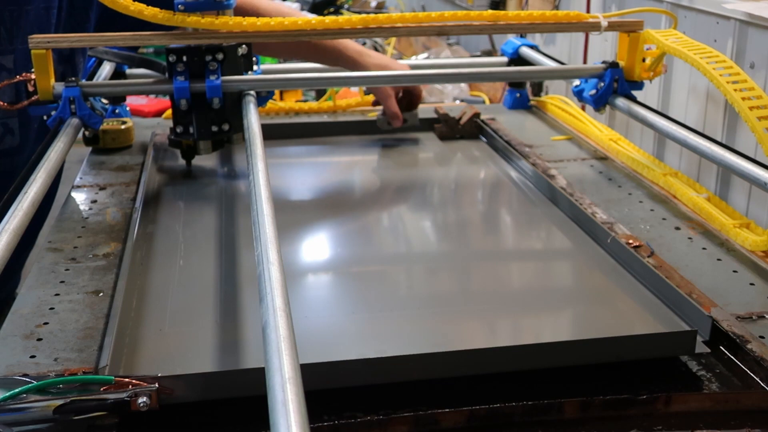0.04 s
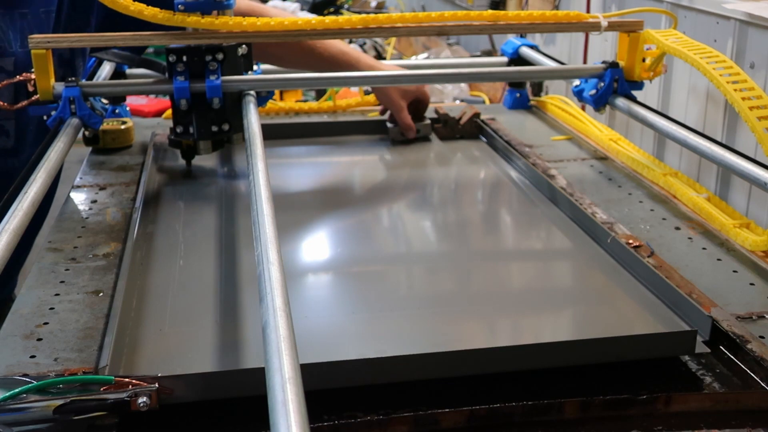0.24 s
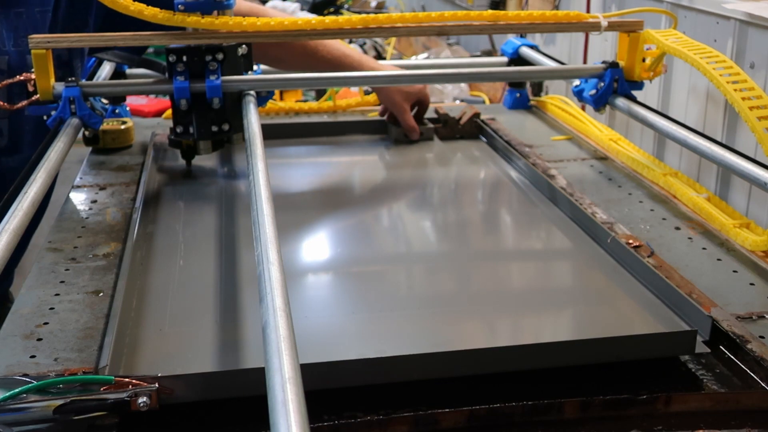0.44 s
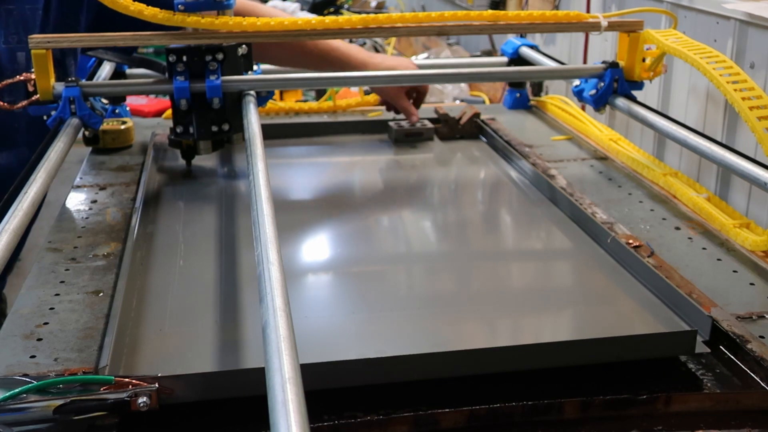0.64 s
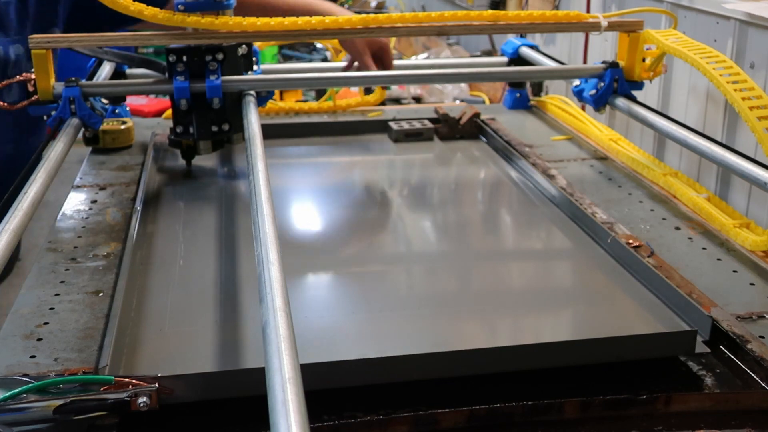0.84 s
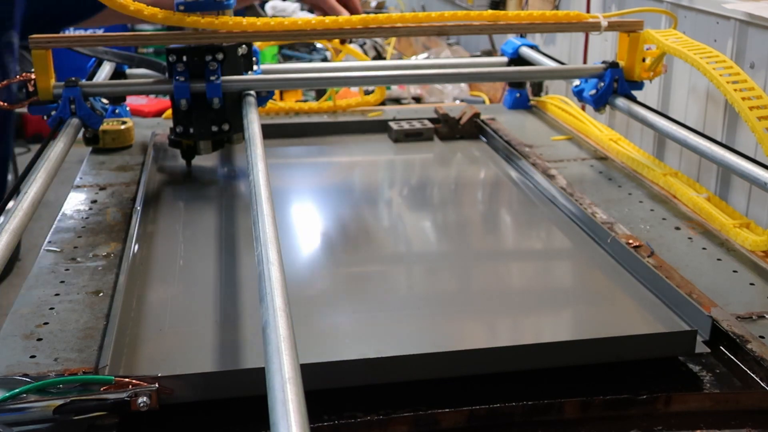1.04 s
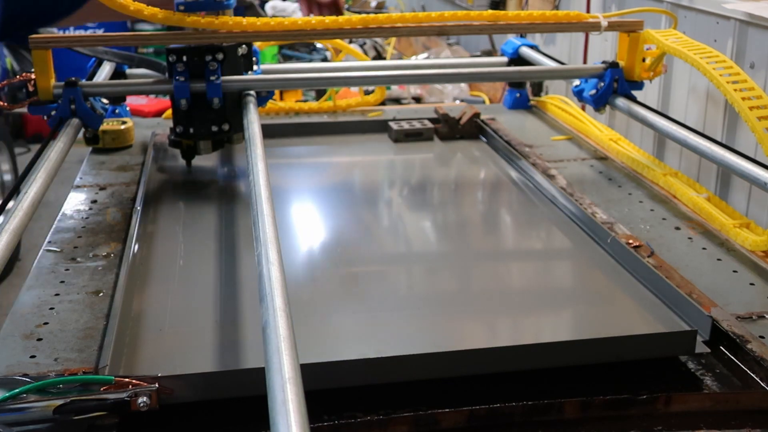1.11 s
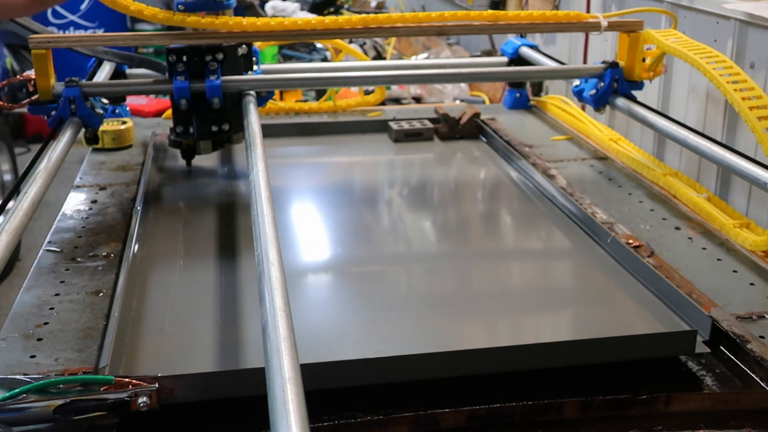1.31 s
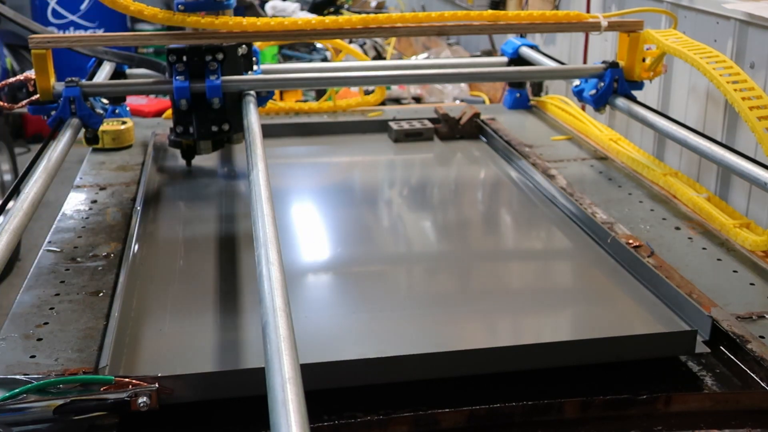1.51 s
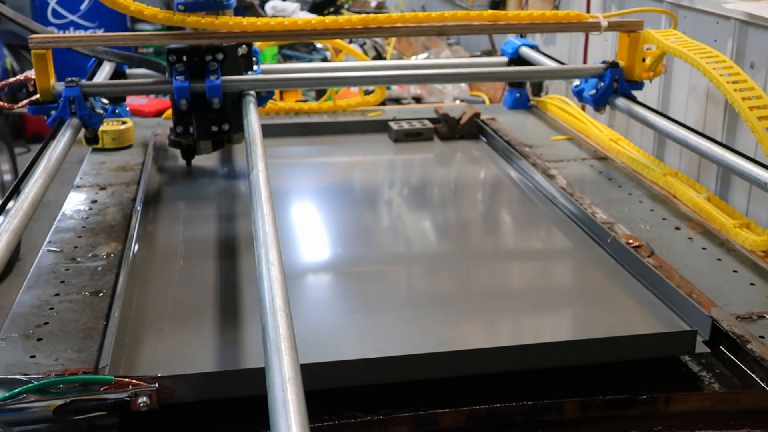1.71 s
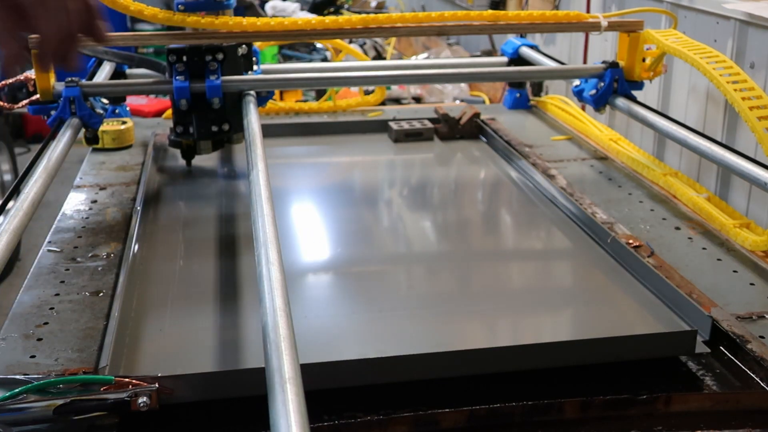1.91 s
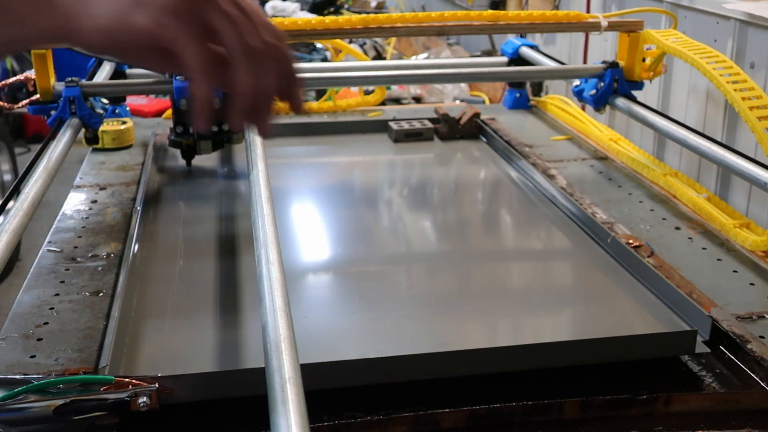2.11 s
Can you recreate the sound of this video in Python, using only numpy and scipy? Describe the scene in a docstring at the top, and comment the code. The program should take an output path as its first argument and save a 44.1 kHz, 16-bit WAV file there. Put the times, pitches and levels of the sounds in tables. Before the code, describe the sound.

A small steel block lands on a large steel sheet with a clunk, scrapes, then drops flat with a brighter clack. The sheet rings briefly close to the microphone, while workshop machinery hums steadily behind.

```python
"""Steel block on a workshop table

Near the stereo microphone, a little to the right, a small steel block is set down on a large steel sheet.
One edge lands with a clunk; the block scrapes, drops flat with a brighter clack and ticks as it is let go.
Each contact rings the damped sheet into the room, until fingers press the block and mute some modes.
Machinery hums steadily behind; faint knocks, handling rustles and a soft bass bump follow."""
import sys
import numpy as np
from scipy import signal
from scipy.fft import rfft, irfft
from scipy.io import wavfile
from scipy.ndimage import uniform_filter1d

SR = 44100
rng = np.random.default_rng(int(sys.argv[2]) if len(sys.argv) > 2 else 0)


def wav_record(signal):
    """Record a signal, one row per channel, as 16-bit PCM in the file named by sys.argv[1]."""
    frames = np.transpose(np.atleast_2d(signal))
    bounded = np.clip(frames, -1, 1)
    # unit amplitude maps onto the largest positive 16-bit level
    quanta = np.round(bounded * 32767).astype(np.int16)
    wavfile.write(sys.argv[1], SR, quanta)


N = 94815


def amp(db):
    """Decibels to gain."""
    return 10 ** (np.asarray(db) / 20)


def unit(x):
    """Scales to rms 1."""
    return x / np.sqrt(np.mean(x ** 2) + 1e-20)


def read(points, hz):
    """Reads a curve on a log-frequency axis."""
    freq_hz, value = np.transpose(points)
    return np.interp(np.log(hz + 1), np.log(freq_hz + 1), value)


def add(mix, start_s, sound):
    """Adds a stereo sound into the mix at start_s."""
    part = mix[:, round(start_s * SR):][:, :sound.shape[1]]
    part += sound[:, :part.shape[1]]


def colour(x, points, size=4096):
    """Minimum-phase filter along a (freq_hz, gain_db) curve."""
    log_gain = np.log(amp(read(points, abs(np.fft.fftfreq(size, 1 / SR)))))
    response = np.exp(np.conj(signal.hilbert(log_gain)))
    taps = np.fft.ifft(response).real[:size // 2]
    return signal.fftconvolve(x, taps[None], axes=1)[:, :x.shape[1]]


def noise(length, level_db, correlation, size=256):
    """Stereo noise shaped by level_db(hz, t), with a left-right correlation curve."""
    frames = dict(fs=SR, nperseg=size, noverlap=size * 3 // 4)
    hz, t, bins = signal.stft(rng.standard_normal((2, length)), **frames)
    shared = np.clip(read(correlation, hz), -1, 1)[:, None]
    bins[1] = shared * bins[0] + np.sqrt(1 - shared ** 2) * bins[1]
    return signal.istft(bins * amp(level_db(hz[:, None], t)), **frames)[1][:, :length]


def drift(rate_hz):
    """Random motion of rms 1, mostly slower than rate_hz."""
    hz = np.fft.rfftfreq(N, 1 / SR)
    return unit(irfft(rfft(rng.standard_normal(N)) / (1 + (hz / rate_hz) ** 2), N))


def ripple(x, depth_db):
    """Many narrow resonances: random, unmoving peaks and dips in the treble."""
    hz = np.geomspace(1500, 15000, 130)
    db = depth_db * rng.standard_normal(len(hz)) * (hz > hz[0])
    return colour(x, list(zip(hz, db)))


def lean(x, balance):
    """Tips each frequency of a stereo sound to one side."""
    half_db = read(balance, np.fft.rfftfreq(N, 1 / SR)) / 2
    return irfft(rfft(x) * amp([half_db, -half_db]), N)


# Air rushing in the machinery at the back of the shop: freq_hz, relative_db
AIR_SPECTRUM = [(25, -32), (60, -14), (105, -40), (135, -12.5), (180, -19), (240, -8.5), (305, -14),
                (375, -5.5), (440, -14.5), (560, -16.5), (660, -14.5), (740, -11), (830, -18.5), (950, -17),
                (1170, -23.5), (1450, -20), (1800, -22.5), (2100, -25), (2750, -26), (3500, -32.5),
                (6000, -37), (7500, -44.5), (8700, -39.5), (9600, -47), (15000, -73.5)]
# How alike the air is in the left and right channels: freq_hz, correlation
AIR_CORRELATION = [(40, 0.99), (700, 0.96), (1400, 0.73), (2700, 0.7), (4000, 0.026), (5500, -0.21),
                   (7500, -0.2), (9000, -1.016)]
def air_rush():
    """A steady rush of air whose spectrum flickers in small patches."""
    def level_db(hz, t):
        patches = uniform_filter1d(rng.standard_normal((len(hz), len(t))), size=12, axis=0)
        patches = unit(uniform_filter1d(patches, size=8, axis=1))
        return read(AIR_SPECTRUM, hz) + 1.5 * patches
    air = noise(N, level_db, AIR_CORRELATION, size=2048)
    return amp(-33.5) * unit(ripple(air, depth_db=1.75))


# Motors running behind the table: pitch_hz, level_db
MOTOR_TONES = [(59.2, -57.5), (236.9, -47), (257, -46.5), (352, -50.5), (386.5, -44), (623, -49),
               (659.8, -36), (679, -41), (1319, -51), (1437, -59), (1507, -50.5), (1550, -56.5),
               (2713, -60)]
# Their drone eases for a moment: time_s, gain_db
DRONE_LEVEL = [(0, 0), (.85, 0), (1.05, -2.3), (1.27, -2.3), (1.4, .8), (1.85, .8), (2.15, 0)]
def machinery(wander_hz=.8, waver_db=.45, drone_below_hz=1100):
    """Wavering motor tones over the air; the low drone dips briefly while the hiss holds."""
    out = air_rush()
    for hz, db in MOTOR_TONES:
        turns = np.cumsum(hz + wander_hz * drift(rate_hz=7)) / SR + rng.random()
        peak = np.sqrt(2) * amp(db + waver_db * drift(rate_hz=7))
        out = out + peak * np.sin(2 * np.pi * turns)
    drone = signal.sosfiltfilt(signal.butter(2, drone_below_hz, fs=SR, output="sos"), out)
    drone_gain = amp(np.interp(np.arange(N) / SR, *np.transpose(DRONE_LEVEL)))
    return out + drone * (drone_gain - 1)


# Knocks from elsewhere in the shop: start_s, thud_db, clang_db, tick_db
FAR_KNOCKS = [(1.398, -6, -30, -45), (1.836, 1.5, -30, -27)]
# Their dull tone: freq_hz, gain_db
KNOCK_SPECTRUM = [(60, -16), (110, -10), (230, -1), (350, 1), (500, 1), (750, -10), (2000, -10),
                  (5000, -14), (12000, -29)]
# How alike left and right are for knocks, rustles and the sheet's dense ring: freq_hz, correlation
ROOM_CORRELATION = [(150, .998), (700, 0.95), (1600, 0.92), (3600, 0.76), (5200, 0.31), (8000, -0.15),
                    (11500, -0.69), (13400, -0.052)]
def far_knocks(rise_s=.008, t60_s=.11):
    """Dull, short knocks away from the sheet, each a dying burst of noise."""
    out = np.zeros((2, N))
    rise = np.minimum(np.arange(SR // 2) / SR / rise_s, 1)
    for start_s, *levels_db in FAR_KNOCKS:
        burst = rise * noise(SR // 2, lambda hz, t: -4 - 60 * t / t60_s, ROOM_CORRELATION)
        knock = colour(burst, KNOCK_SPECTRUM)
        add(out, start_s, colour(knock, hardness(*levels_db)))
    return out


def bass_bump(start_s=1.795, pitch_hz=64.3, peak_db=-41, rise_s=.035):
    """A few soft cycles of bass swell and fade."""
    t = np.maximum(np.arange(N) / SR - start_s, 0)
    swell = t / rise_s * np.exp(1 - t / rise_s)
    return amp(peak_db) * swell * np.sin(2 * np.pi * pitch_hz * t)


# Handling, faint at the microphone: start_s, length_s, level_db
HANDLING = [(1.01, 0.07, -63), (1.792, .12, -54), (1.872, .07, -62), (1.962, .09, -59)]
# Its hiss: freq_hz, relative_db
RUSTLE_SPECTRUM = [(300, -8), (3000, 3), (8000, -3), (13000, -2.5), (15000, -14)]
def handling_rustles(grain_db=5):
    """Soft, grainy swells of high hiss from handling."""
    out = np.zeros((2, N))
    for start_s, length_s, db in HANDLING:
        length = round(length_s * SR)
        hiss = noise(length, lambda hz, t: read(RUSTLE_SPECTRUM, hz), ROOM_CORRELATION)
        grains = amp(grain_db * drift(rate_hz=120)[:length])
        add(out, start_s, amp(db) * np.hanning(length) * unit(hiss * grains))
    return out


# The sheet's many weak modes and their echo in the room, by block pose: freq_hz, on_edge_db, flat_db
RING_SPECTRUM = [(60, -58, -67), (130, -21, -22), (192.4, -15.5, -11), (265, -1, -1), (350, -3, -6),
                 (425, -8, -15), (510, -2, -13), (650, -3, -8), (1000, 0.5, -2.5), (1510, -3, -4),
                 (2030, -8.5, -17), (2870, -12.5, -10.5), (3540, -17.5, -19), (5000, -26, -23),
                 (6600, -22.5, -24), (8500, -29.5, -27), (11500, -22.5, -21.5), (13300, -19.5, -22),
                 (15000, -35, -32)]
# How long they hang in the room: freq_hz, t60_s
RING_DECAY = [(150, 0.78), (600, 0.85), (1500, .45), (3500, 0.5), (7000, 0.37), (13000, 0.16)]
def dense_ring(flat, contact_s=.0018, crack_t60_s=.063):
    """The sheet answers one tap with a short crack and a dense, dying ring."""
    rise = np.minimum(np.arange(SR) / SR / contact_s, 1)
    tail = noise(SR, lambda hz, t: -6.5 - 60 * t / read(RING_DECAY, hz), ROOM_CORRELATION)
    crack = noise(SR, lambda hz, t: -2 - 60 * t / crack_t60_s, ROOM_CORRELATION)
    spectrum = [(hz, flat_db if flat else edge_db) for hz, edge_db, flat_db in RING_SPECTRUM]
    return colour(rise * (tail + crack), spectrum)


# Short slides of the block across the sheet: start_s, length_s, relative_db
BLOCK_SLIDES = [(0.461, .03, -19), (.485, 0.05, -11), (0.658, 0.016, -16)]
# Bright tone of steel catching on steel: freq_hz, gain_db
SCRAPE_SPECTRUM = [(300, -1), (2000, -2.5), (6000, 4.5), (13000, 4.5)]
def block_scrape(catches_per_s=2300, swell_db=7.5):
    """Tiny catches of the sliding edge excite the sheet, harder toward the end of each slide."""
    force = np.zeros(N)
    for start_s, length_s, db in BLOCK_SLIDES:
        progress = (np.arange(N) / SR - start_s) / length_s
        sliding = (progress > 0) & (progress < 1)
        force += amp(db - 22.5 + swell_db * np.clip(progress, 0, 1)) * sliding
    catches = force * rng.standard_normal(N) * (rng.random(N) < catches_per_s / SR)
    ring = colour(dense_ring(flat=False), SCRAPE_SPECTRUM)
    return signal.fftconvolve(catches[None], ring, axes=1)[:, :N]


FLAT_FROM_S, SEATED_FROM_S = .5, .57  # the block is on its edge, then flat, then seated
# Clear modes of the sheet on the table: pitch_hz, on_edge_db, flat_db, seated_db, t60_s, pressed_db
SHEET_MODES = [(327.8, 5, 1, 1.5, 0.21, -9.5), (512, 3, -8, -3, .36, -4), (553, 4, -20, -20, .24, -7),
               (600.4, -5, -1.5, -1.5, 1, -1), (646.3, 3, 5, 4, 0.4, 1.5), (675, 1.5, -6, -4, .4, -1),
               (726, -1.5, -12.5, -6.5, 0.83, -1.5), (810, -2.5, -4.5, -11, .4, -9),
               (870, -5.5, -3, -2.5, 0.54, -1.5), (887.4, 1, -12, -12, 0.33, -8),
               (910, -5, -6, 11, .86, -20), (987, -6, -10, -4.5, .45, -11.5),
               (1130, -18, -6.5, -3, .45, -12), (1215, -11, -6.5, -12, 0.2, -9),
               (1358, -8, -9, -4.5, 0.9, -5.5), (1438, -14, -11, -11.5, 0.45, -8),
               (1565, -8, -12.5, -16, .35, -8), (1678, -17, -6, -15, 0.29, -9),
               (1763, -12, -15, -15, .3, -8), (2810, -10.5, -13, -16, 0.27, -9)]
def sheet_modes(contacts, press_s=.645, press_rise_s=.019, sag_hz=60, sag_s=.016, shimmer_hz=2):
    """Contacts feed the modes, weighted by how the block lies; pressing fingers mute some of them."""
    t, out = np.arange(N) / SR, np.zeros(N)
    pressed = np.clip((t - press_s) / press_rise_s, 0, 1)
    landing_s, lowest_hz = contacts[0][0], SHEET_MODES[0][0]
    # The low modes start sharp at the first blow and sag into tune.
    sharp_hz = sag_hz * np.exp(-np.maximum(t - landing_s, 0) / sag_s)
    for hz, edge_db, flat_db, seated_db, t60_s, pressed_db in SHEET_MODES:
        energy_in = np.zeros(N)
        for start_s, *levels_db in contacts:
            pose_db = (edge_db if start_s < FLAT_FROM_S else
                       flat_db if start_s < SEATED_FROM_S else seated_db)
            energy_in[round(start_s * SR)] += amp(read(hardness(*levels_db), hz) + pose_db) ** 2
        kept_per_sample = amp(-60 / (t60_s * SR)) ** 2
        energy = signal.lfilter([1], [1, -kept_per_sample], energy_in)
        envelope = amp(pressed_db * pressed) * uniform_filter1d(np.sqrt(energy), size=64)
        pitch_hz = hz + sharp_hz * (lowest_hz / hz) ** 2 + shimmer_hz * drift(rate_hz=20)
        turns = np.cumsum(pitch_hz) / SR + rng.random()
        out += envelope * np.sin(2 * np.pi * turns)
    return amp(-22.5) * out


def hardness(thud_db, clang_db, tick_db):
    """A contact's hardness weights the low, middle and high ring: a (freq_hz, gain_db) curve."""
    return [(490, thud_db), (2200, clang_db), (9000, tick_db)]


# The block meeting the sheet, near the microphone: start_s, thud_db, clang_db, tick_db
BLOCK_CONTACTS = [(0.3157, -3.5, -2, -4), (0.3204, -10.5, -2, -14.5), (0.3262, -2.5, -1, -18),
                  (0.337, -4, -13, -10), (0.3446, -6.5, -12, -22), (0.3564, -1, -9, -16.5),
                  (0.3865, -12, -23.5, -34), (0.431, -18, -19, -32), (0.517, -19, -15, -13),
                  (0.5224, -13, -5.5, -1.5), (0.5268, -3.5, 3.5, -1.5), (0.5436, -10, -5.5, -18),
                  (0.584, -8.5, -15, -34.5), (0.620, -11, -25.5, -40), (0.670, -28, -18, -12),
                  (0.743, -12.5, -33, -35), (0.800, -10.5, -28, -48), (0.858, -25.5, -38.5, -47.5)]
def steel_block():
    """The block lands, rocks and settles; each contact sounds the dense ring and the clear modes."""
    rings = np.zeros((2, N))
    for start_s, *levels_db in BLOCK_CONTACTS:
        ring = dense_ring(flat=start_s > FLAT_FROM_S)
        add(rings, start_s, colour(ring, hardness(*levels_db)))
    return ripple(rings, depth_db=2.5) + sheet_modes(BLOCK_CONTACTS)


# The sheet, a little right of the microphone: freq_hz, left_minus_right_db
SHEET_PLACE = [(250, 1), (700, -2.5), (1500, -2), (3000, -1), (10000, 0)]
# The shop around it, almost centred: freq_hz, left_minus_right_db
SHOP_PLACE = [(300, -0.13), (700, -1), (1500, -0.64), (4000, 0.7)]
def scene():
    """The block a little to the right, the workshop all around."""
    sheet = steel_block() + block_scrape()
    shop = far_knocks() + bass_bump() + handling_rustles() + machinery()
    return lean(sheet, SHEET_PLACE) + lean(shop, SHOP_PLACE)


def record(dry):
    """The recorder cuts the highest treble steeply."""
    low_pass = signal.firwin(511, cutoff=15150, window=("kaiser", 9), fs=SR)
    return signal.oaconvolve(dry, low_pass[None], "same")


dry = scene()
out = record(dry)
wav_record(out)
```